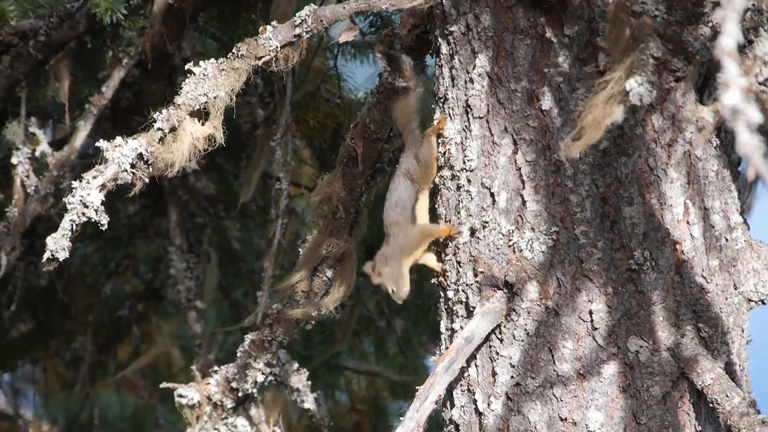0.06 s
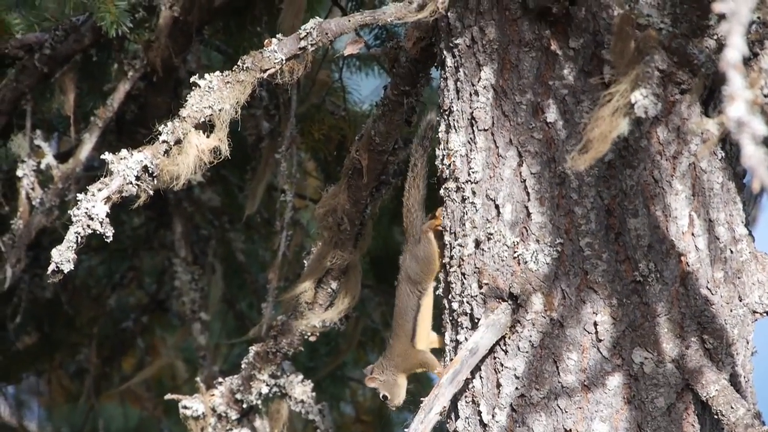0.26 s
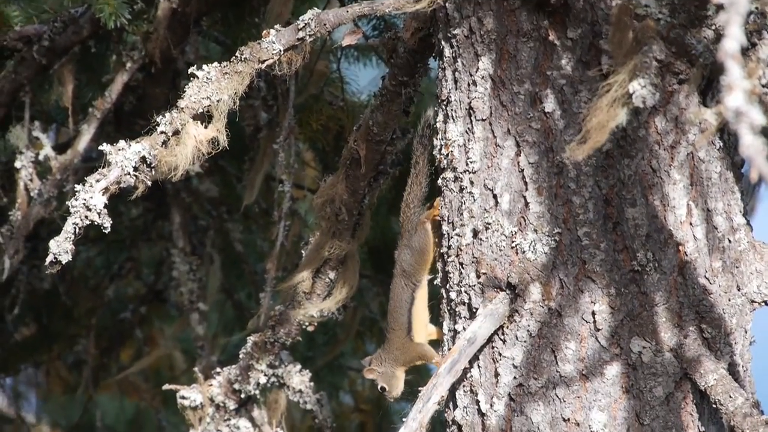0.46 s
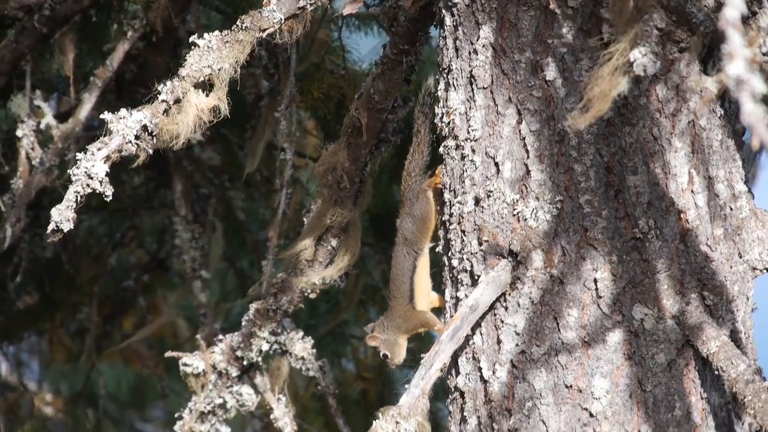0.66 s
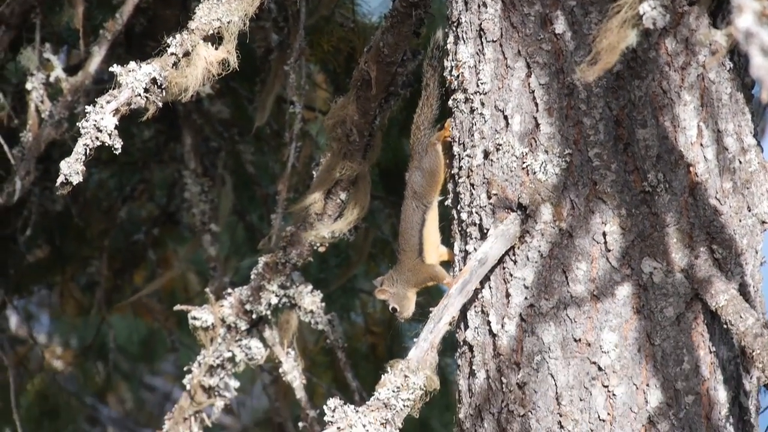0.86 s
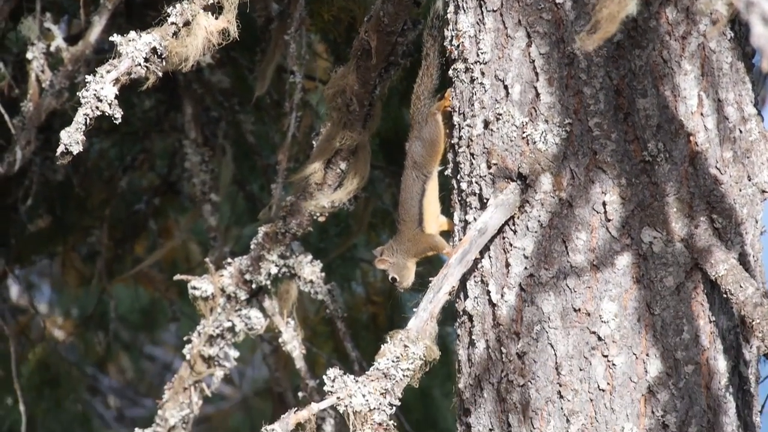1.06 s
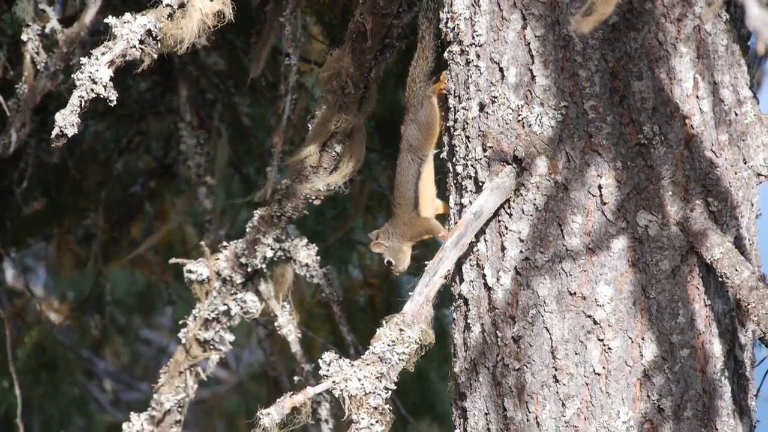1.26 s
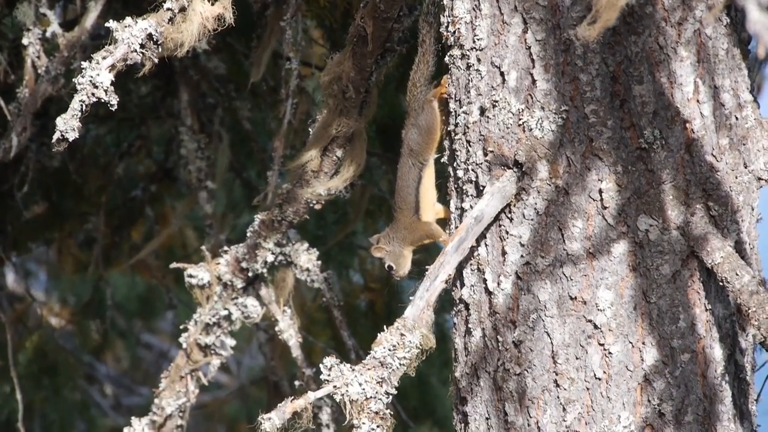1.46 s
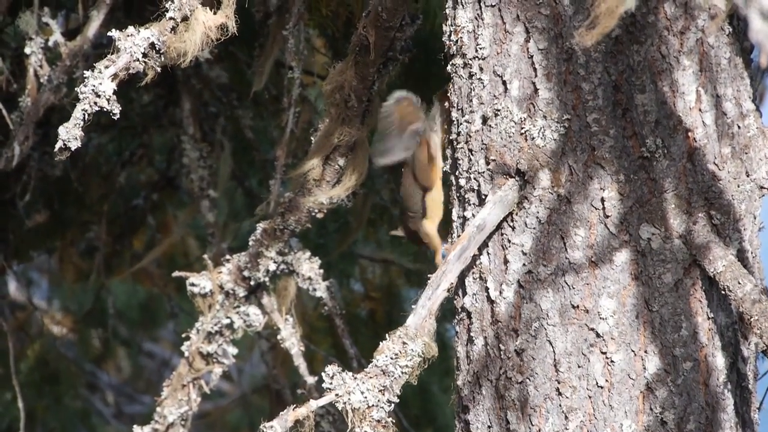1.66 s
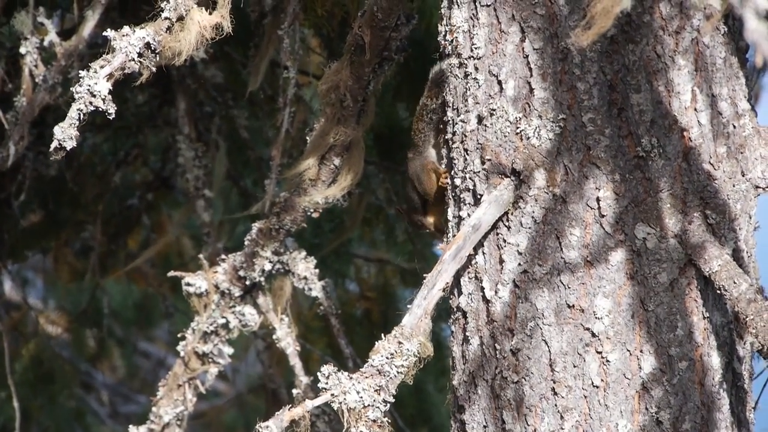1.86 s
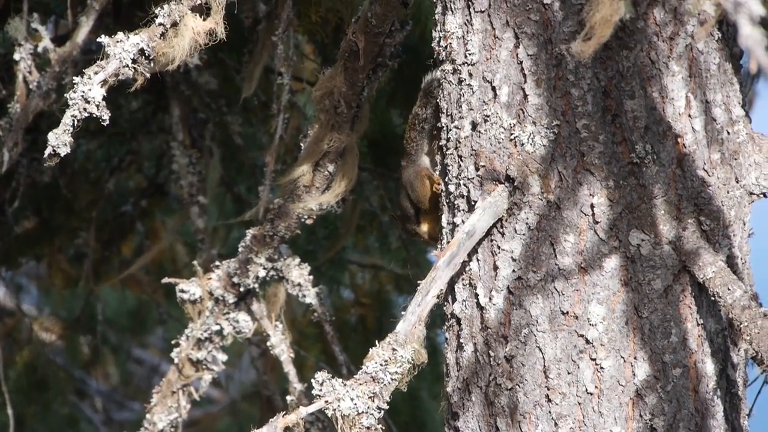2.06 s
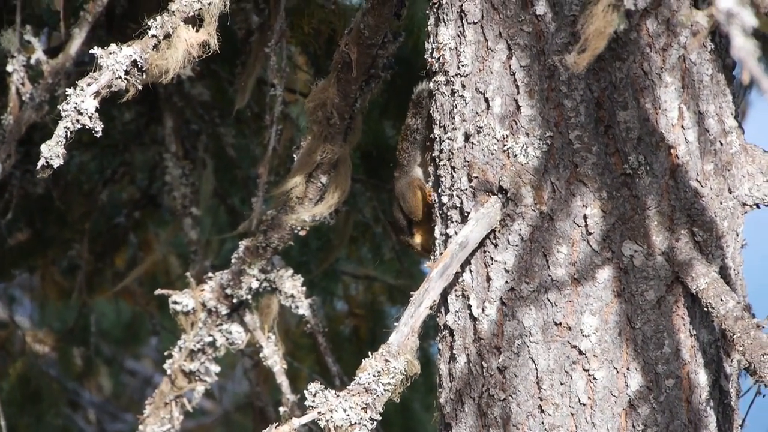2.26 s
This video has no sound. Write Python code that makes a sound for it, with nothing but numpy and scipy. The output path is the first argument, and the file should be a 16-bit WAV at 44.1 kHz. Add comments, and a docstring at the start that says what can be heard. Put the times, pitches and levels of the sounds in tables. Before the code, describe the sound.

Two short squirrel chirps drop in pitch outdoors, with low wind bumps on the microphone.

```python
"""A steady distant rush fills a forest, and from the start soft low thumps buffet the microphone,
mostly on the right. At 0.2 s a squirrel on a conifer trunk gives an alarm call: a quick upward flick,
a sharp squeak rich in overtones, then a whistle that falls more than an octave over a little hiss.
The trees answer with a faint echo. Bark ticks faintly at 1.2 s and 1.7 s, a second, softer call
follows at once, and a last tiny tick comes at 2.1 s."""
import sys
import numpy as np
from scipy import signal
from scipy.fft import rfft, irfft, next_fast_len
from scipy.io import wavfile
from scipy.ndimage import map_coordinates

SR = 44100
rng = np.random.default_rng(int(sys.argv[2]) if len(sys.argv) > 2 else 0)


def transcribe(u):
    """Save the signal u as a 16-bit wav file named by the first command-line argument.

    u: samples, shape (n,) or (channels, n), limited to [-1, 1]; the rate is SR.
    q: integer samples, one column per channel.
    """
    v = np.clip(np.atleast_2d(u).T, -1, 1)
    q = np.round(v * 32767).astype(np.int16)
    wavfile.write(sys.argv[1], SR, q)


N = 101430
TIME = np.arange(N) / SR

# tone colour of the distant rush and of its bass: f/Hz, level/dB
RUSH_COLOUR = [(100, -28), (350, -5), (480, -5.5), (650, -3.5), (850, -3), (1200, -4), (1600, -9.5),
               (2000, -9), (2400, -13.5), (3200, -11.5), (4800, -16.5), (7500, -23), (11000, -27),
               (15500, -30.5)]
BASS_COLOUR = [(20, -15.5), (60, 1), (150, -1.5), (300, -11.5), (500, -26), (1000, -60)]
# narrow bands that stand out in the rush: f/Hz, width/Hz, level/dB
RUSH_BANDS = [(800, 12.5, -70.5), (906, 30, -71.5), (1130.6, 22, -66.5), (1244, 120, -68.5),
              (1954, 21, -78)]
# how alike left and right sound: f/Hz, likeness (1 = the same, 0 = unrelated)
RUSH_LIKENESS = [(60, 0.23), (150, 0.4), (380, -0.09), (950, 0.67), (2380, 0.6), (5980, 0.57),
                 (15000, 0.28)]
BASS_LIKENESS, HISS_LIKENESS = [(100, 0.27)], [(5000, 0.78)]
# thumps on the microphone: t/s, level/dB, f/Hz
MIC_THUMPS = [(.022, -36, 164), (.033, -39, 159), (0.211, -30.5, 162), (.262, -33.5, 154),
              (0.33, -37.5, 159), (.363, -40.5, 209), (.380, -36.5, 165), (0.453, -41, 156),
              (0.513, -37, 170), (.609, -31, 183), (.770, -35, 194), (0.781, -34.5, 161), (.825, -38, 150),
              (.865, -36, 138), (.891, -40, 174), (.914, -37.5, 135), (.977, -37.5, 176), (0.995, -36, 145),
              (1.040, -37, 132), (1.078, -38.5, 152), (1.143, -37, 160), (1.17, -37, 132),
              (1.184, -28.5, 148), (1.209, -44, 145), (1.367, -41, 141), (1.431, -37, 187),
              (1.483, -53, 191), (1.497, -37, 154), (1.87, -39, 151), (2.050, -32, 170.5),
              (2.186, -42.5, 166), (2.268, -42.5, 157)]
# loudness of the low flutter under the thumps: t/s, level/dB
FLUTTER_LEVELS = [(0, -55), (.2, -49.5), (.4, -46.5), (.53, -44.5), (.7, -55.5), (.84, -45), (.95, -61.5),
                  (1.1, -52), (1.21, -49.5), (1.3, -62), (1.48, -47.5), (1.6, -60.5), (1.72, -55.5),
                  (1.8, -59), (1.89, -56), (2.0, -60.5), (2.3, -54)]
# tone colour of that flutter: f/Hz, level/dB
FLUTTER_COLOUR = [(20, -33), (45, -45), (85, 3), (140, 3), (210, -9), (300, -13.5), (450, -27), (900, -70)]
# bark ticks: t/s, level/dB, f/Hz, time to fade by 60 dB/s, crack level against the knock/dB, crack f/Hz
BARK_TICKS = [(1.2415, -40, 900, .017, -9, 3200), (1.708, -48, 950, .014, -9, 3300),
              (2.097, -65, 1100, .04, -1, 10500)]
# tone colour of a tick's crack: multiple of the crack's frequency, level/dB
CRACK_COLOUR = [(0.1, -50), (0.86, -14), (1, 0), (0.96, -20), (2, -50)]
# tone colour of the soft rubbing around a tick: f/Hz, level/dB
SCRAPE_COLOUR = [(300, -16), (750, 5), (1300, -6), (2200, -27), (3300, -9), (6000, -36), (12000, -55)]
# how long the forest rings: f/Hz, time to fade by 60 dB/s
FOREST_FADE = [(500, 0.84), (2000, 0.82), (5000, 0.2), (10500, 0.49), (15000, 0.44)]
# tone colour of the echo from farther trees: f/Hz, level/dB
ECHO_COLOUR = [(1000, -15), (4300, -16), (8500, 0), (10500, 9), (13000, 5)]
# alarm calls: squeak t/s, swell/s, fade/s, squeak level/dB, mouth resonance f/Hz,
# flick's head start/s, flick level/dB, hiss level/dB
CALLS = [(0.225, 0.023, .019, -28.5, 10660, .011, -34.5, -57),
         (1.7418, 0.017, .016, -34.5, 8600, .014, -39.5, -63.5)]
# tone colour of the puff of air that starts a squeak: f/Hz, level/dB
PUFF_COLOUR = [(600, -20), (1500, 7), (2500, 3.5), (5000, 3.5), (9000, -18), (15000, -28)]
# the squeak's harmonics, lowest first: start level/dB, level after the swell/dB, fade/dB,
# left minus right/dB
SQUEAK_HARMONICS = [(-5.5, 1, 15, -2.8), (-23.5, -8.5, 17, 7), (-20, -32.5, 2, 3), (-21, -20.5, 4, 2.5),
                    (-23.5, -26, 10, -2), (-33, -39, 2, 5), (-47, -46, 2, -2)]
# tone colour of the breath in the squeak and the hiss after it: f/Hz, level/dB
BREATH_COLOUR = [(2500, -2.5), (4000, -3), (7000, -7.5), (9000, -2), (10700, 1.5), (12500, -11.5),
                 (15500, -12)]
# the falling whistles, one list for each call: t/s, f/Hz, level/dB
WHISTLE_PATHS = [
    [(.273, 2130, -54), (.277, 2074, -48), (.283, 1945, -37), (.302, 1688, -42.5), (.322, 1552, -39),
     (.351, 1255, -39), (.373, 1141, -44), (.392, 1039, -52), (.410, 936, -65.5), (.433, 777, -56),
     (.446, 686, -70)],
    [(1.777, 2188, -66), (1.784, 2048, -66), (1.789, 1944, -41), (1.807, 1638, -47), (1.820, 1493, -44.5),
     (1.835, 1250, -43), (1.855, 1175, -47), (1.897, 1082, -55), (1.922, 906, -67), (1.935, 706, -71),
     (1.958, 584, -66)],
]
# each whistle's octave against its main tone, at the squeak's pitch: level/dB
WHISTLE_OCTAVES = [-48, -40]

SQUEAK_HZ = 2144


def amp(db):
    """Turn decibels into a number to multiply by."""
    return 10 ** (np.asarray(db) / 20)


def unit(x):
    """Scale a signal so that its average strength (rms) is 1."""
    return x / np.sqrt(np.mean(x ** 2) + 1e-20)


def along(points, hz):
    """Read between the rows of an (f/Hz, value) table, giving each octave equal room."""
    freqs, values = np.transpose(points)
    return np.interp(np.log(hz + 1), np.log(freqs + 1), values)


def wobble(rate):
    """A smooth curve through `rate` random values a second."""
    return map_coordinates(rng.standard_normal(int(N * rate / SR) + 4), [TIME * rate])


def filtered(x, response):
    """Turn each frequency in x up or down by response(hz)."""
    size = next_fast_len(N + SR // 2)
    return irfft(rfft(x, size) * response(np.fft.rfftfreq(size, 1 / SR)), size)[..., :N]


def colour(points):
    """Make a filter response from an (f/Hz, level/dB) table."""
    return lambda hz: amp(along(points, hz))


def noise(points):
    """Noise of strength 1 with the given tone colour."""
    return unit(filtered(rng.standard_normal(N), colour(points)))


def stereo_noise(response, likeness):
    """Noise of strength 1: one part shared by both ears, one part opposite in them."""
    def split(hz):
        angle = np.arccos(np.clip(along(likeness, hz), -1, 1)) / 2
        return response(hz) * np.array([np.cos(angle), np.sin(angle)])
    shared, opposite = filtered(rng.standard_normal((2, N)), split)
    return unit(np.array([shared + opposite, shared - opposite]))


def pan(x, db):
    """Make a sound `db` louder on the left than on the right."""
    return x * amp([[db / 2], [-db / 2]])


def gate(start, end, attack_s=0.0011, release_s=0.0045):
    """Fade in quickly at the start and out after the end."""
    return np.clip((TIME - start) / attack_s, 0, 1) * np.clip(1 - (TIME - end) / release_s, 0, 1)


def phase_of(hz):
    """Add up a changing pitch into the angle of a sine wave."""
    return 2 * np.pi * np.cumsum(hz) / SR


def distant_rush(rush_db=-60, bass_db=-66.5):
    """Steady, gently wavering noise with a few narrow bands in it and a soft bass."""
    rush = amp(rush_db + 0.98 * wobble(6.43)) * stereo_noise(colour(RUSH_COLOUR), RUSH_LIKENESS)
    for centre, width, db in RUSH_BANDS:
        rush += amp(db) * stereo_noise(lambda hz: 1 / (1 + ((hz - centre) / width) ** 2), RUSH_LIKENESS)
    return rush + amp(bass_db) * stereo_noise(colour(BASS_COLOUR), BASS_LIKENESS)


def buffeting(width_cycles=0.44, skew_rad=0.84, swing_db=3, thump_left_db=-28.5, flutter_left_db=-14):
    """Dull thumps on the microphone, each about one wave long, over an uneven low flutter."""
    thumps = np.zeros(N)
    for centre, db, hz in MIC_THUMPS:
        cycles = (TIME - centre) * hz
        bump = np.exp(-(cycles / width_cycles) ** 2 / 2)
        thumps += amp(db) * bump * np.cos(2 * np.pi * cycles + skew_rad)
    flutter_level = amp(np.interp(TIME, *np.transpose(FLUTTER_LEVELS)))
    flutter_level *= unit(amp(swing_db * wobble(55)))
    left = amp(thump_left_db) * thumps + amp(flutter_left_db) * flutter_level * noise(FLUTTER_COLOUR)
    right = thumps + flutter_level * noise(FLUTTER_COLOUR)
    return np.array([left, right])


def bark_ticks(scrape_db=-17.5, scrape_width_s=0.017, scrape_lag_s=0.007):
    """Each tick of bark is a small dry knock with a brief crack on top, inside a soft scrape."""
    out = np.zeros(N)
    for start, db, hz, fade_s, crack_db, crack_hz in BARK_TICKS:
        t = np.maximum(TIME - start, 0)
        knock = np.sin(2 * np.pi * hz * t)
        crack = amp(crack_db) * noise([(crack_hz * ratio, level) for ratio, level in CRACK_COLOUR])
        out += amp(db - 60 * t / fade_s) * (TIME > start) * (knock + crack)
        bump = np.exp(-((TIME - start - scrape_lag_s) / scrape_width_s) ** 2 / 2)
        out += amp(db + scrape_db) * bump * noise(SCRAPE_COLOUR)
    return out


def reflect(x, pattern):
    """Play x through a stereo pattern of echoes, scaled so its left side has energy 1."""
    return signal.fftconvolve(x, pattern / np.linalg.norm(pattern[0]), axes=1)[:, :N]


def forest(calls, near_db=-12, tail_db=-20.5, far_db=-24, far_delay_s=0.125, far_spread_s=0.03):
    """Sound bounces off near trunks and branches, lingers softly, and returns from farther trees."""
    length = SR // 2
    hz, t, spectrum = signal.stft(rng.standard_normal((2, length)), SR, nperseg=256)
    fading = amp(-60 * t / along(FOREST_FADE, hz)[:, None])
    tail = signal.istft(spectrum * fading, SR, nperseg=256)[1]
    lag = np.arange(length) / SR
    far = rng.standard_normal((2, length)) * np.exp(-((lag - far_delay_s) / far_spread_s) ** 2 / 2)
    near = np.zeros((2, length))
    bounce_s = 0.002 + 0.027 * rng.random(size=(2, 12))  # twelve quick bounces for each ear
    for ear, samples in zip(near, (SR * bounce_s).astype(int)):
        ear[samples] = rng.standard_normal(len(samples))
    # foliage scatters the sound, shifting its phase at random by about one radian
    blurred = np.real(signal.hilbert(calls) * np.exp(1j * wobble(500)))
    far_echo = amp(far_db) * filtered(reflect(blurred, far), colour(ECHO_COLOUR))
    return amp(near_db) * reflect(calls, near) + amp(tail_db) * reflect(blurred, tail) + far_echo


def hiss(start, db, rise_s=0.014, fade_s=0.48):
    """Airy hiss under the whistle that flickers and dies away."""
    t = np.maximum(TIME - start, 0)
    level = amp(db - 60 * t / fade_s + 2 * wobble(200)) * np.minimum(t / rise_s, 1)
    return level * stereo_noise(colour(BREATH_COLOUR), HISS_LIKENESS)


def puff(start, db, fade_s=0.018):
    """A brief burst of air as the voice breaks into the squeak."""
    return amp(db - 60 * np.abs(TIME - start) / fade_s) * (TIME > start) * noise(PUFF_COLOUR)


def flick(start, db, from_hz=1150, to_hz=2387, rise_s=0.00532, peak_s=0.0029):
    """A short pure tone that shoots up to about the squeak's pitch."""
    t = np.maximum(TIME - start, 0)
    pitch = to_hz + (from_hz - to_hz) * np.exp(-t / rise_s)
    level = amp(db) * t / peak_s * np.exp(1 - t / peak_s)
    return level * np.sin(phase_of(pitch))


def whistle(path, octave_db, growth_db_per_octave=27, flutter_db=1.8):
    """A falling, fluttering tone; the octave above it comes out as the pitch sinks."""
    times, hz, db = np.transpose(path)
    pitch = np.interp(TIME, times, hz)
    phase = phase_of(pitch * (1 + 0.00587 * wobble(300)))
    octave = amp(octave_db + growth_db_per_octave * np.log2(SQUEAK_HZ / pitch))
    level = amp(np.interp(TIME, times, db) + flutter_db * wobble(220)) * gate(times[0], times[-1])
    return np.sqrt(2) * level * (np.sin(phase) + octave * np.sin(2 * phase))


def squeak(start, swell, fade, db, mouth_hz, mouth_db=8, mouth_width_hz=1200):
    """A breathy note that starts bright, swells low down and fades; the mouth lifts nearby overtones."""
    waver_hz, waver_period_s, roughness_rad, breath_db = 32, 0.028, 0.013, -29
    t = TIME - start
    pitch = SQUEAK_HZ + waver_hz * np.cos(2 * np.pi * t / waver_period_s)
    phase = phase_of(pitch) + roughness_rad * wobble(1200)
    voice = amp(breath_db) * noise(BREATH_COLOUR)
    for k, (start_db, swell_db, fade_db, pan_db) in enumerate(SQUEAK_HARMONICS, 1):
        level_db = np.interp(t, [0, swell, swell + fade], [start_db, swell_db, swell_db - fade_db])
        lift_db = mouth_db / (1 + ((k * SQUEAK_HZ - mouth_hz) / mouth_width_hz) ** 2)
        harmonic = amp(level_db + lift_db + 1.1 * wobble(300)) * np.sin(k * phase)
        voice = voice + pan(harmonic, pan_db)
    return amp(db) * gate(start, start + swell + fade) * voice


def squirrel(puff_db=-17, hiss_delay_s=0.047):
    """Two alarm calls: each is a flick, a squeak with a puff of air, then a whistle over hiss."""
    whistles = sum(whistle(path, db) for path, db in zip(WHISTLE_PATHS, WHISTLE_OCTAVES))
    out = pan(whistles, db=0.9)
    for start, swell, fade, db, mouth_hz, lead, flick_db, hiss_db in CALLS:
        out += flick(start - lead, flick_db)
        out += puff(start, db + puff_db)
        out += squeak(start, swell, fade, db, mouth_hz)
        out += hiss(start + hiss_delay_s, hiss_db)
    return out


def scene():
    """The squirrel and its forest echo, with the rush, the thumps and the bark ticks."""
    calls = squirrel()
    return calls + forest(calls) + distant_rush() + buffeting() + bark_ticks()


def record(dry, top_hz=15700):
    """Cut away the very highest treble."""
    return filtered(dry, lambda hz: hz < top_hz)


dry = scene()
out = record(dry)
transcribe(out)
```